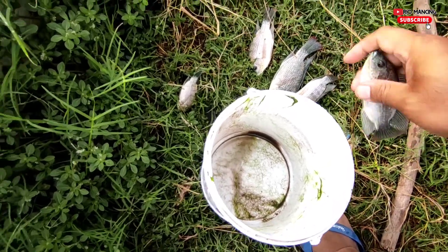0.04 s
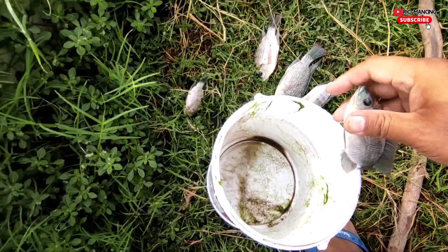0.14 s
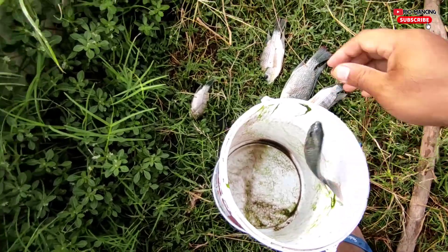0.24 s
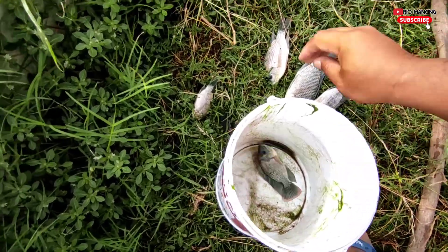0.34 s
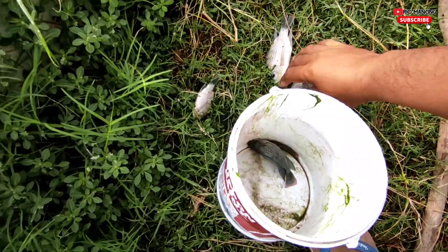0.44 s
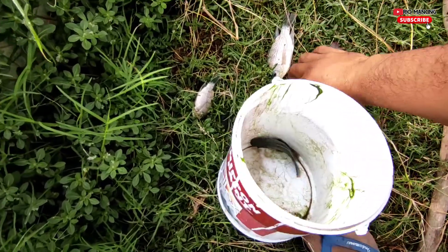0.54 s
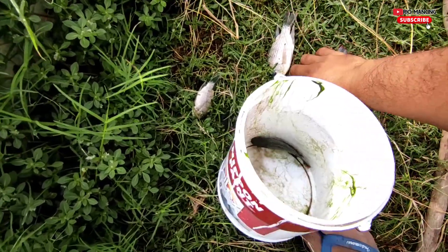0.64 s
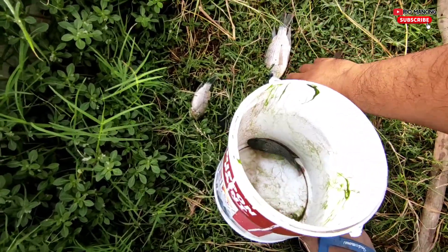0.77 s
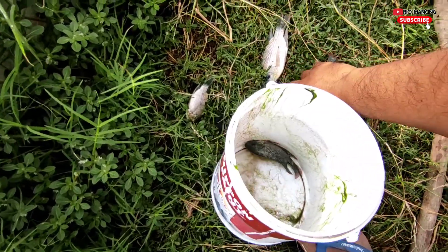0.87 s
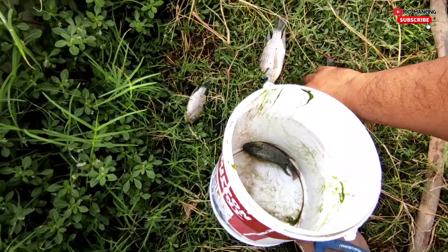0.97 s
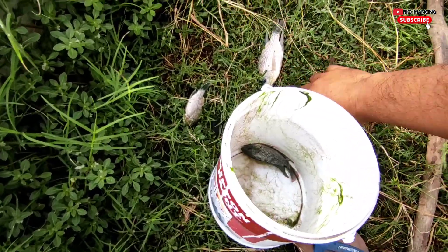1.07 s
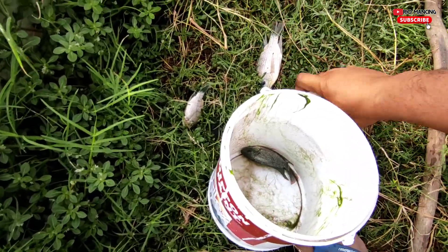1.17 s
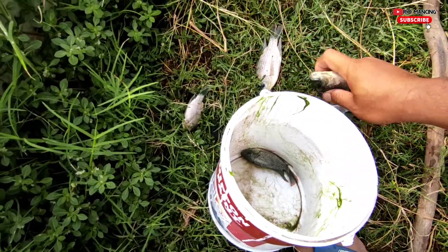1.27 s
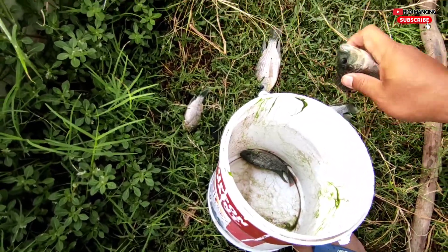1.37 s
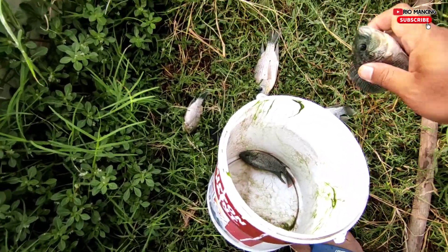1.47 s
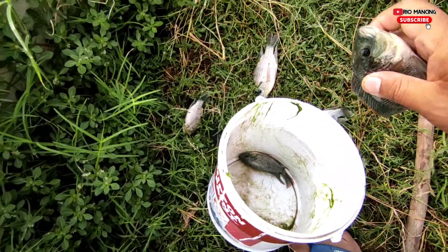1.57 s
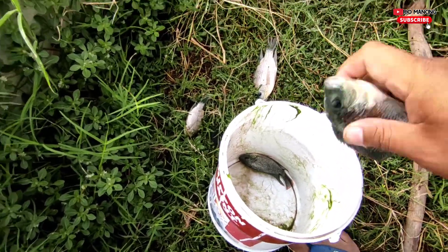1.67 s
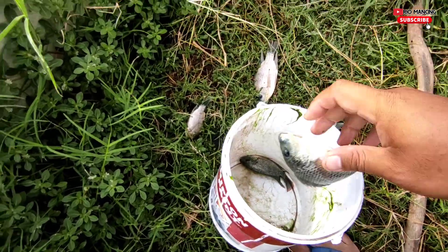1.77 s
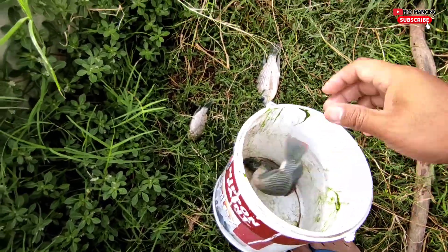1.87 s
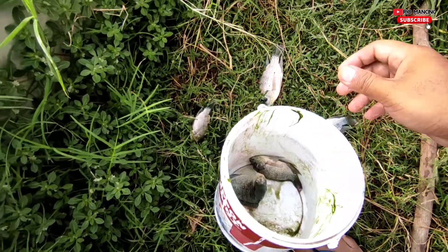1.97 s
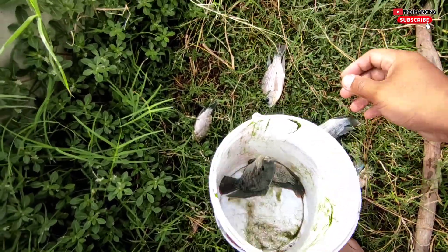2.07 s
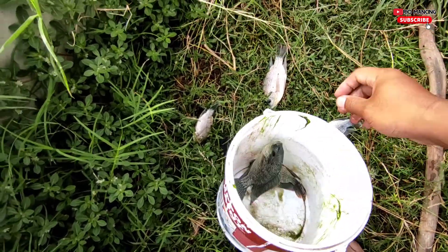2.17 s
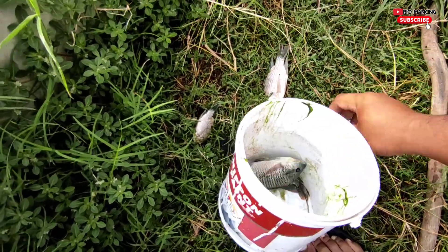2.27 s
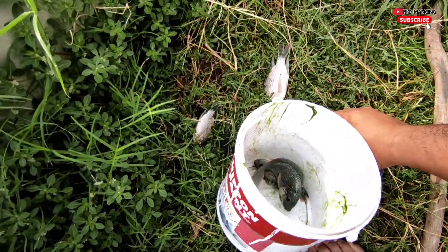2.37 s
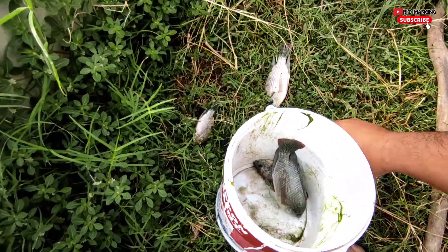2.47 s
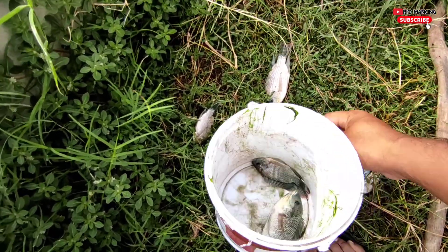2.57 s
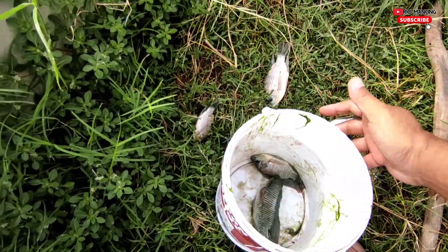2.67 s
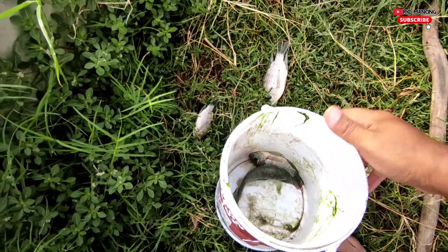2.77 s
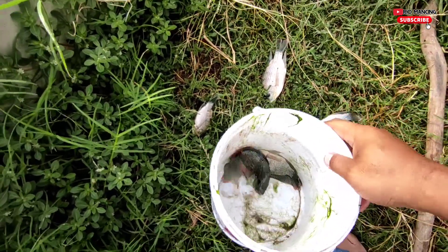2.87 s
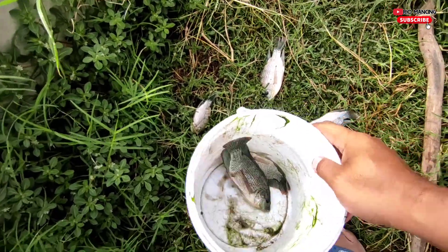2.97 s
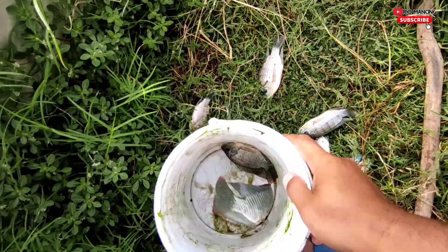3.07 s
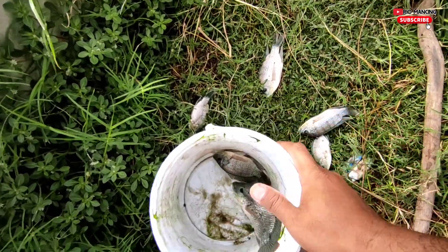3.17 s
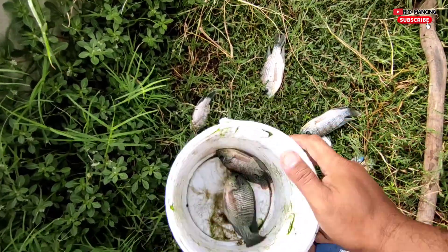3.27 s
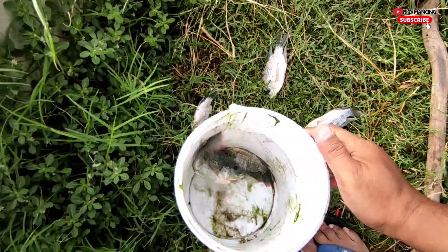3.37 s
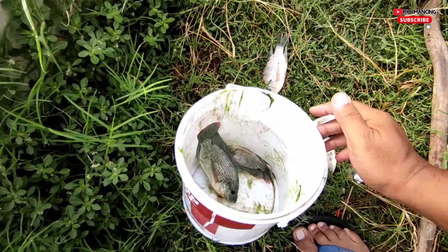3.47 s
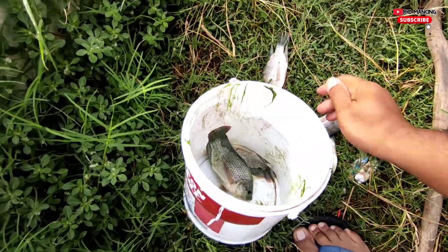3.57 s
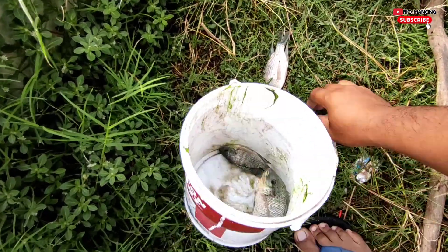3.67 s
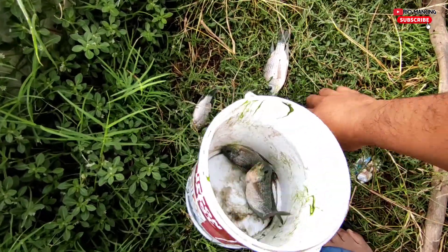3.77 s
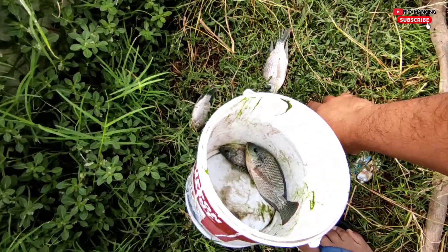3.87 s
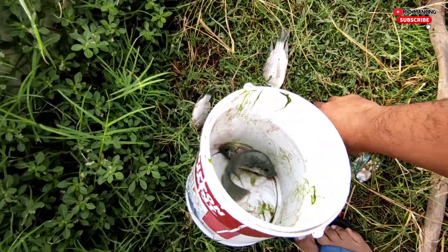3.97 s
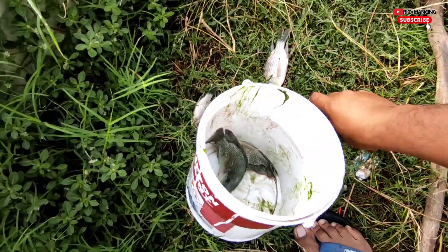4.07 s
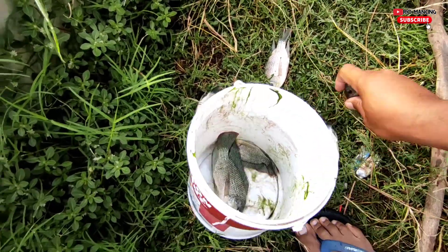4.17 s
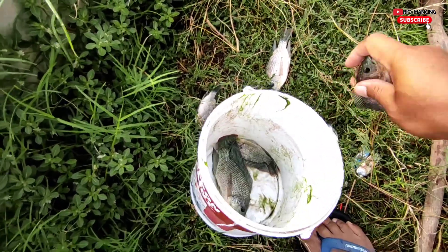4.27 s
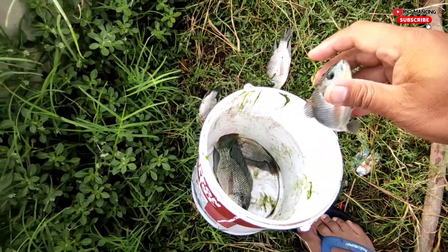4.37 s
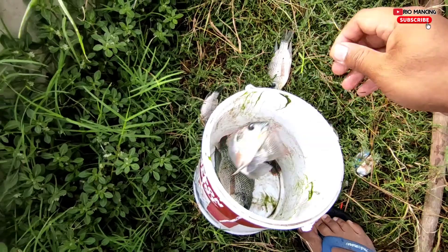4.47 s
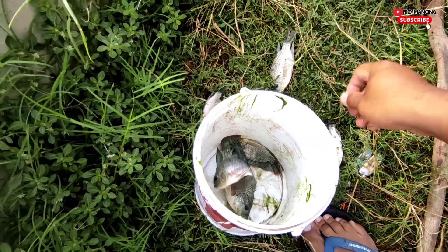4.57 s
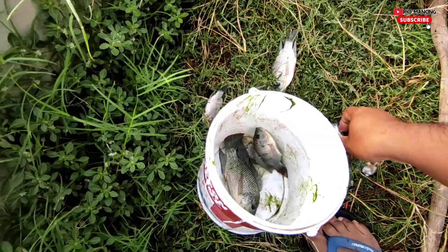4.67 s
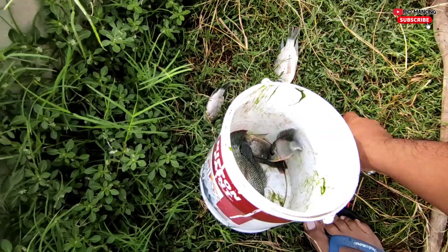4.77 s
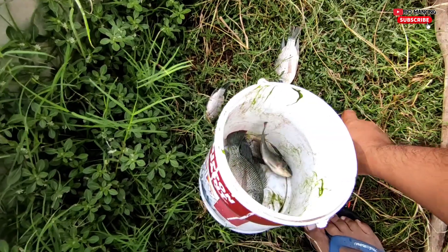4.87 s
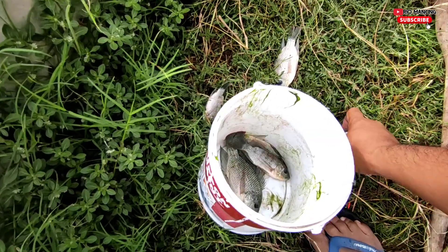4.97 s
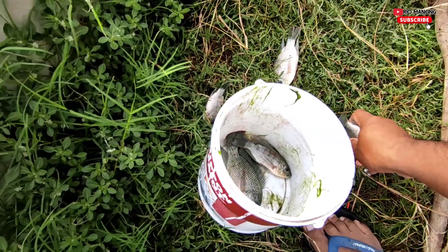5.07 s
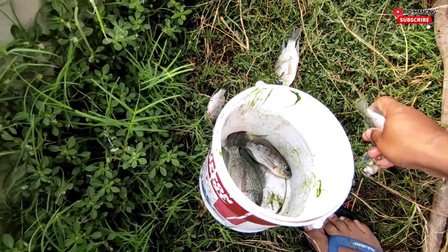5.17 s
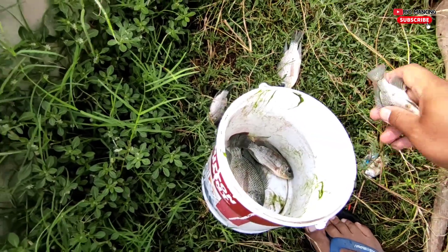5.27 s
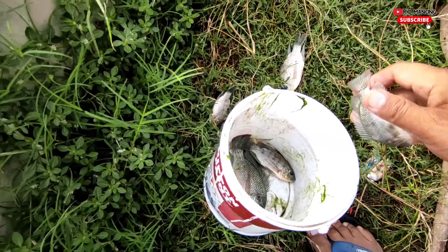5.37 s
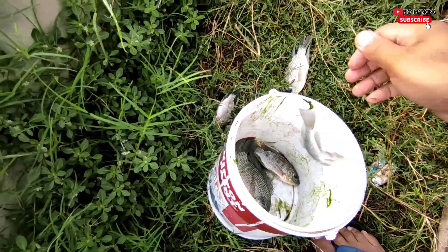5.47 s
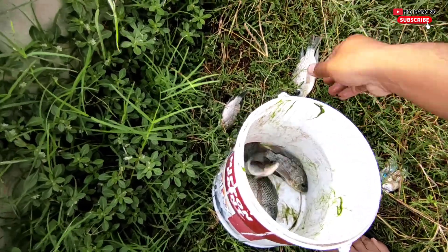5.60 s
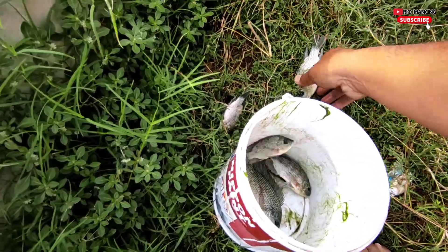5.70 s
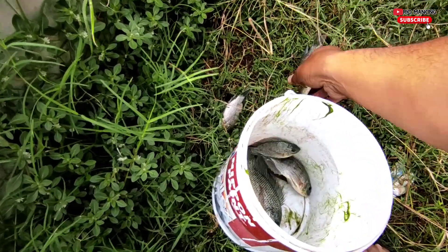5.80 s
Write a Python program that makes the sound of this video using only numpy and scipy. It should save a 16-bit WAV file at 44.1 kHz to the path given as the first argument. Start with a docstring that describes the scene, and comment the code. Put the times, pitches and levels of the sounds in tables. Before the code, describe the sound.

Live fish drop one by one into a plastic bucket outdoors, thumping hollowly and slapping wetly while an insect buzzes thinly nearby.

```python
"""An insect buzzes in the weeds over low breeze rumble and a faint wash of open air; a cricket chirps far off.
Live fish then drop into a plastic bucket on grass and flap about: struck modes give the thumps of their bodies.
Enveloped, coloured noise gives the wet tail smacks, a faint tick in the grass, the slither of scales
and the insect's wing strokes. Damped sines nudge the bucket over the turf, and swells of low noise groan
as a hand shifts it."""
import sys
import numpy as np
from scipy import signal
from scipy.io import wavfile
from scipy.ndimage import uniform_filter1d

SR = 44100
rng = np.random.default_rng(int(sys.argv[2]) if len(sys.argv) > 2 else 0)


def output_pcm(signal):
    """Save a mono or channel-first signal as 16-bit PCM at the path in sys.argv[1].

    Samples are clipped to [-1, 1] before scaling.
    """
    pcm = np.clip(np.atleast_2d(signal).T, -1, 1) * 32767
    wavfile.write(sys.argv[1], SR, np.round(pcm).astype(np.int16))


N = 257544
TIME = np.arange(N) / SR  # s
PORT_SHIFT = 0.0175  # the left microphone port rings this share higher, the right one lower


def amp(db):
    """Decibels to gain."""
    return 10 ** (np.asarray(db) / 20)


def unit(x):
    """Scales to rms 1."""
    return x / np.sqrt(np.mean(x ** 2) + 1e-20)


def sides(db):
    """Left and right gains for a level difference, positive to the left."""
    gains = amp(np.array([[db / 2], [-db / 2]]))
    return gains / gains.mean()


def level(curve):
    """Gain along a curve of (time [s], level [dB]), with short fades at its ends and silence outside."""
    s, db = np.transpose(curve)
    fade = np.interp(TIME, [s[0] - 0.02, s[0], s[-1], s[-1] + 0.044], [0, 1, 1, 0])
    return amp(np.interp(TIME, s, db)) * fade


def swell(s, half):
    """A smooth rise and fall around time s, down to 1/e at half seconds either side."""
    return np.exp(-np.minimum(((TIME - s) / half) ** 2, 20))


def add(mix, s, sound):
    """Mixes a stereo sound in at time s."""
    part = mix[:, max(round(s * SR), 0):][:, :sound.shape[1]]
    part += sound[:, :part.shape[1]]


def pair(size, alike):
    """White noise at two microphones, partly shared."""
    z = rng.standard_normal((3, size))
    alike = np.clip(alike, 0, 1)
    return np.sqrt(alike) * z[0] + np.sqrt(1 - alike) * z[1:]


def wander(size, per_s):
    """Random drift of rms a little under 1: straight lines between per_s random points a second."""
    knots = np.arange(size) * per_s / SR
    return np.interp(knots, np.arange(size), rng.standard_normal(size))


def tint(x, spectrum):
    """Colours each channel with a minimum-phase filter, at unit power gain on the left."""
    f, db = np.transpose(spectrum)
    hz = abs(np.fft.fftfreq(4096, 1 / SR)) + 1
    curves = [np.interp(np.log(hz), np.log(f * (1 + k * PORT_SHIFT)), db) for k in (1, -1)]
    log_gain = np.log(amp(curves))
    response = np.exp(np.conj(signal.hilbert(log_gain)))
    taps = np.fft.ifft(response).real[:, :len(hz) // 2]
    return signal.oaconvolve(x, taps / np.linalg.norm(taps[0]), axes=1)[:, :x.shape[1]]


def patchy(x, db, size):
    """The colour shifts from moment to moment, as the fish screen different parts of the wall."""
    z = signal.stft(x, nperseg=512, noverlap=384)[2]
    patches = rng.standard_normal(z.shape[1:])
    for axis in (0, 1):  # smooth over frequency, then over time
        patches = uniform_filter1d(patches, size[axis], axis)
    gain = unit(amp(db * np.minimum(unit(patches), 1)))  # deep notches, low crests
    return signal.istft(z * gain, nperseg=512, noverlap=384)[1][:, :N]


def inside(x, wet_db, t60, dull_hz=5000, count=160):
    """Adds the quick reflections between the bucket's walls, which lose their treble."""
    t = np.arange(SR // 6) / SR
    # scattered echoes, crowded towards the start
    at = SR // 800 + (len(t) * 0.9 * rng.random((2, count)) ** 1.5).astype(int)
    taps = np.zeros((2, len(t)))
    np.put_along_axis(taps, at, rng.choice([-1., 1.], at.shape), 1)
    taps = (taps + taps[::-1] / 2) * amp(-60 * t / t60)  # each side also hears half of the other
    taps = taps / np.linalg.norm(taps[0])
    taps = signal.lfilter(*signal.butter(1, dull_hz, fs=SR), taps)
    return x + amp(wet_db) * signal.oaconvolve(x, taps, axes=1)[:, :N]


# colour of the open air: (frequency [Hz], relative density [dB per Hz])
FIELD_COLOUR = [(30, 12.5), (250, 10), (550, 8.5), (1000, 1), (1800, -3.5), (4500, -3.5), (5600, -4.5),
                (6500, -3.5), (9800, -7.5), (11000, -28), (16000, -39)]


def field(gain_db=-70):
    """The faint wash of open air is steady broadband noise."""
    return amp(gain_db) * tint(pair(N, 0.096), FIELD_COLOUR)


# the chirping: (time of one chirp's crest [s], pitch [Hz], rate [chirps per s])
CRICKET_CHIRP = (.29, 5550, 3.92)
# the cricket carries only now and then: (time [s], level before the fading [dB])
CRICKET_LEVEL = [(0, -83), (0.9, -72), (1.7, -76.5), (2.4, -82), (5.84, -83)]


def cricket(pan_db=-4, sharp=3.0, fade_db=2):
    """Faint chirps of narrow noise, blurred by the grass and fading in and out on the breeze."""
    crest, hz, per_s = CRICKET_CHIRP
    chirps = np.exp(sharp * (np.cos(2 * np.pi * per_s * (TIME - crest)) - 1))
    fading = amp(fade_db * np.tanh(wander(N, 4.4)))
    band = [(hz * 0.8, -40), (hz, 0), (hz * 1.2, -40)]  # (Hz, dB)
    return level(CRICKET_LEVEL) * sides(pan_db) * chirps * fading * tint(pair(N, 0.4), band)


INSECT_HZ, INSECT_LEAD_S = 173, 0.00041  # mean wing strokes a second; lead at the left microphone
# the insect's course: (time [s], level before the gain [dB])
INSECT_LEVEL = [(0.0, -51), (0.89, -50.5), (1.3, -54), (3.84, -52), (4.41, -54), (4.8, -50.5),
                (5.02, -51.5), (5.84, -51.5)]
# colour of the wing rasp: (frequency [Hz], relative density [dB per Hz])
BUZZ_COLOUR = [(5000, -48.5), (6800, -29), (7350, -22.5), (7750, -1), (8250, 7), (8700, 3.5), (9200, -5),
               (10100, -17.5), (10500, -57.5), (11500, -88.5)]


def insect(gain_db=3, depth=0.3, drift=0.0035, flutter_db=1.7, pan_db=-3.0, alike=0.095):
    """Each wing stroke rasps a short, high burst of noise, which reaches the left microphone first."""
    strokes = np.cumsum(INSECT_HZ * (1 + drift * wander(N, 3.8))) / SR
    beat = 1 + depth * np.cos(2 * np.pi * strokes)
    rasp = unit(beat * amp(flutter_db * wander(N, 26)))
    left, right = tint(rasp * pair(N, alike), BUZZ_COLOUR)
    right = np.roll(right, round(INSECT_LEAD_S * SR))
    return amp(gain_db) * level(INSECT_LEVEL) * sides(pan_db) * np.array([left, right])


# the breeze and low noise: (time [s], level before the pan [dB])
BREEZE_LEVEL = [(0, -51.5), (2.3, -50), (3.0, -46), (3.4, -46.5), (3.8, -43), (4.2, -51), (4.5, -44),
                (4.9, -46.5), (5.84, -47.5)]
# colour of the low noise: (frequency [Hz], relative density [dB per Hz])
LOW_COLOUR = [(20, -8), (60, 5), (110, -1), (180, -4), (300, -14), (500, -23.5), (900, -36.5),
              (2000, -78.5)]
# colour of the breeze on the microphones: (frequency [Hz], relative density [dB per Hz])
GUST_COLOUR = [(20, 4.5), (50, -2.5), (100, -11), (250, -22.5), (1000, -64.5)]


def breeze(lumps, gusts_db=-5):
    """Low noise partly shared by the microphones, and a breeze that brushes each one separately."""
    low = tint(lumps * pair(N, 0.57), LOW_COLOUR)
    gusts = amp(gusts_db) * tint(lumps * pair(N, 0), GUST_COLOUR)
    return level(BREEZE_LEVEL) * (low + gusts)


# the hand shifts the bucket: (time [s], level before the pan [dB], half length [s])
HAND_SHIFTS = [(3.03, -40.5, 0.18), (3.835, -36.5, 0.094), (4.55, -49.5, 0.31)]
# colour of the bucket under the hand: (frequency [Hz], relative density [dB per Hz])
GRIP_COLOUR = [(20, -9), (70, -4), (130, -0.5), (220, -0.5), (300, -8.5), (380, -2.5), (500, -22),
               (1500, -52)]


def handling(lumps):
    """The bucket groans dully under the hand, in slow swells of low noise."""
    grip = sum(amp(db) * swell(s, half) for s, db, half in HAND_SHIFTS)
    return grip * tint(lumps * pair(N, 0.64), GRIP_COLOUR)


def rumble(lump_db=3, pan_db=5):
    """Breeze and handling share one lumpy flow, stronger at the left microphone."""
    lumps = unit(amp(lump_db * wander(N, 25)))
    return sides(pan_db) * (breeze(lumps) + handling(lumps))


ROCK_DB, ROCK_LAG_S, ROCK_HZ = -24, 0.0162, 138.4  # rock after each thump: relative level, delay, pitch
DRAG_FROM_S, DRAG_TO_S, DRAG_DB = 3.829, 3.93, -29.5  # the bucket judders as it is shoved over the turf
JUDDER_HZ, JUDDER_SPREAD = 141, 0.44  # middle pitch of the judders, and their spread in octaves
# the bucket is nudged on the turf: (time [s], peak level before the pan [dB], pitch [Hz])
NUDGES = [(0.408, -35, 122), (2.363, -26, 139), (3.735, -35, 151), (3.853, -23, 100), (4.407, -26.5, 174.4),
          (4.503, -32, 87), (5.313, -35.5, 72.2), (5.734, -37, 72.6)]


def bumps(width_s=0.00091, t60=0.06, pan_db=7, uneven_s=0.0026, count=5):
    """The turf damps the bucket, so each nudge, rock or judder is a dull, quickly dying sine."""
    mix, t = np.zeros((2, N)), np.arange(SR // 8) / SR
    rocks = [(s + ROCK_LAG_S, db + ROCK_DB, ROCK_HZ) for s, db, *_ in THUMPS]
    judders = []
    for s in np.linspace(DRAG_FROM_S, DRAG_TO_S, count):
        late, high = rng.standard_normal(2)
        judders.append((s + uneven_s * late, DRAG_DB, JUDDER_HZ * 2 ** (JUDDER_SPREAD * high)))
    for s, db, hz in NUDGES + rocks + judders:
        envelope = (1 - np.exp(-t / width_s)) * amp(-60 * t / t60)
        bump = envelope * np.sin(2 * np.pi * hz * t)
        add(mix, s, amp(db) * sides(pan_db) * bump / abs(bump).max())
    return mix


WIPE_HALF_S = 0.017
SKID_DB, SKID_LAG_S = -25.5, 0.0093  # the body skids a little after each thump: relative level, delay
# scales sliding on wet plastic, one curve per bout of wriggling: (time [s], level before the gain [dB])
SLITHER_BOUTS = [
    [(0.43, -70), (0.55, -54.5), (0.66, -72), (1.1, -77)],
    [(2.19, -56), (2.27, -48.5), (2.4, -55), (2.82, -57.5), (2.9, -48), (3.15, -45.5), (3.45, -53.5),
     (3.55, -55.5)],
    [(3.58, -55), (3.68, -59), (3.82, -46), (3.95, -50), (4.05, -59.5), (4.23, -53.5), (4.29, -61.5)],
    [(4.47, -73), (4.54, -63.5), (4.63, -54), (4.72, -41.5), (4.8, -52.5), (5.08, -65)],
    [(5.6, -62.5), (5.76, -53), (5.84, -70)],
]
# a fish wipes along the wall or through the hand:
# (time [s], level before the wipe gain [dB], wet fizz relative to the wipe [dB])
WIPES = [(0.396, -29, -4), (1.888, -46, 4), (1.962, -25.5, -2.5), (2.054, -33, -12), (2.192, -38, -19),
         (2.225, -33.5, 1), (2.366, -45, -25), (2.464, -33.5, 1.5), (2.622, -34.5, 0), (3.502, -41, -22),
         (3.724, -30, 1), (3.908, -34.5, -13), (3.966, -38, 1.5), (4.573, -26, 2), (4.605, -31, 2),
         (4.679, -24.5, 0.5), (4.728, -36.5, 5.5), (4.848, -46, 5), (4.960, -54.5, 7), (5.639, -36, 2),
         (5.665, -44, 3)]
# colour of the scales: (frequency [Hz], relative density [dB per Hz])
SCALE_COLOUR = [(150, -15.5), (380, 10.5), (650, -7), (1050, 2.5), (1500, -2), (2200, -0.5), (3400, -6.5),
                (5000, -12.5), (7000, -4), (12000, -34)]


def slither(gain_db=-3, wipe_db=-11, fizz_db=-3, skid_fizz_db=-12, clump_db=5.0, grain_db=4.0, patchy_db=4):
    """Scales and fins catch and slip in clumps of small clicks; each wipe swells them and squeezes out water."""
    rub = amp(gain_db) * sum(level(bout) for bout in SLITHER_BOUTS)
    fizz = amp(fizz_db) * rub
    skids = [(s + SKID_LAG_S, db + SKID_DB, skid_fizz_db) for s, db, *_ in THUMPS]
    for s, db, wet_db in WIPES + skids:
        stroke = amp(db + wipe_db) * swell(s, WIPE_HALF_S)
        rub = rub + stroke
        fizz = fizz + amp(wet_db) * stroke
    clumps_db = clump_db * np.tanh(wander(N, 120))
    catches = unit(amp(clumps_db + grain_db * wander(N, 2500)))
    dry_rub = tint(rub * catches * pair(N, 0.23), SCALE_COLOUR)
    wet_fizz = tint(fizz * catches * pair(N, 0.075), SPRAY_COLOUR)
    return patchy(inside(dry_rub + wet_fizz, wet_db=-4.5, t60=0.069), patchy_db, size=(4, 16))


SMACK_RISE_S = 0.0007
# a wet tail or flank smacks the plastic; the faint one at 1.402 s is a tick in the grass:
# (time [s], level before the layer gains [dB], mid-range body relative to the spray [dB],
# left-right difference [dB], t60 [s])
SMACKS_AND_TICK = [(0.379, -21, -2.5, -0.5, 0.02), (0.414, -33.5, 0, 0, 0.066),
                   (1.402, -48, -22, -5, 0.037), (1.941, -32.5, -1, -6, 0.061),
                   (1.996, -30, -1.5, 0.5, 0.11), (2.075, -33.5, -8, -3, 0.043), (2.260, -33, 9, 0, 0.078),
                   (2.280, -31, -1, 1, 0.073), (2.457, -31.5, -1.5, -6, .05),
                   (2.4848, -35, 10.5, -2, 0.027), (2.683, -30.5, 4.5, -3, 0.086),
                   (2.715, -27.5, -12, -1, .027), (2.745, -29.5, -4.5, 1, .022),
                   (2.875, -36.5, 7, 3, 0.032), (3.064, -11.5, -13.5, 2, 0.032),
                   (3.163, -30, 0.5, -10, 0.047), (3.181, -14, -26, -4.5, 0.037),
                   (3.324, -16, -36, 2, 0.013), (3.3315, -21, -25, -3, 0.011),
                   (3.399, -31.5, -2.5, 0, 0.12), (3.615, -28, -1.5, -2, 0.053),
                   (3.643, -27.5, -10.5, -1, 0.043), (3.704, -37.5, 4.5, -3, 0.16),
                   (4.055, -16.5, -4.5, 4.5, 0.029), (4.146, -25, 1, -1, 0.03), (4.580, -20, 4, 2, 0.016),
                   (4.639, -24, -11, -5, 0.029), (4.694, -25, -18, -14, 0.023),
                   (4.7143, -29, 8.5, -4, 0.047), (4.873, -22.5, -10.5, -0.5, 0.023),
                   (5.678, -23.5, -10.5, 5, 0.028)]
# colour of bursting water, in the slither too: (frequency [Hz], relative density [dB per Hz])
SPRAY_COLOUR = [(300, -29), (1500, -26), (4500, -13.5), (6500, -5.5), (7700, 2.5), (8800, 1.5),
                (9700, -9.5), (11000, -21.5), (12800, -22), (15500, -28)]
# colour of the slapping flank: (frequency [Hz], relative density [dB per Hz])
FLESH_COLOUR = [(150, -32.5), (380, 12), (650, -5), (1100, 2), (1500, 0), (2200, 3.5), (3200, -4.5),
                (5000, -8), (7000, -36), (12000, -64)]


def smacks(spray_db=-3, flesh_db=-5.5, grain_db=4.5, brush_db=-24, brush_s=0.0057, patchy_db=4):
    """A tail brushes in, then its water film bursts in tiny cracks; the tick in the grass is made the same way."""
    spray, flesh = np.zeros((2, N)), np.zeros((2, N))
    t = np.arange(-SR // 40, SR // 6) / SR  # starts before the hit, for the brush
    for s, db, body_db, pan_db, t60 in SMACKS_AND_TICK:
        decay = amp(-60 * np.maximum(t - 2 * SMACK_RISE_S, 0) / t60)
        burst = (1 + np.tanh(t / SMACK_RISE_S)) * decay
        shape = burst / burst.max() + amp(brush_db) * np.exp(-abs(t) / brush_s)
        cracks = amp(db) * shape * unit(amp(grain_db * wander(len(t), 1510.5)))
        add(spray, s + t[0], cracks * sides(pan_db) * pair(len(t), 0.0073))
        add(flesh, s + t[0], cracks * amp(body_db) * pair(len(t), 0.53))
    splash = inside(amp(spray_db) * tint(spray, SPRAY_COLOUR), wet_db=-12.5, t60=0.25)
    slap = inside(amp(flesh_db) * tint(flesh, FLESH_COLOUR), wet_db=-6, t60=0.27)
    return patchy(splash + slap, patchy_db, size=(4, 10))


AIR_HZ, BUILD_S = 380, 0.003284  # reference pitch and build-up time of the air tone
BASE_FOLLOWS = 0.45  # dB of base boom for each dB of ring in the plastic
RING_LENGTH, LINGER_PER_DB = 0.61, 0.017  # share of the free ring time; a muted ring is fainter but lingers
THUMP_PAN_DB = 7.5  # left-right
# a fish body hits the bucket; skids and rocks follow it too: (time [s], drive level before the gain [dB],
# air tone [Hz], ring of the plastic before its trim [dB], muting by the body [dB])
THUMPS = [(0.378, -18.5, 396, -24, -24), (0.385, -12.5, 389, -16, -13.5), (0.393, -23, 320, -5, -4),
          (0.402, -22.5, 391, -17, -4), (0.447, -36, 410, -6.5, -8), (1.942, -29, 340, -15, -2),
          (1.962, -17.5, 361, -18.5, -6), (1.980, -17.5, 370, -17, -3.5), (2.026, -28, 426, -9.5, -6),
          (2.265, -17.5, 390, -36, 1), (2.343, -23.5, 451, -17, -7.5), (2.361, -36.5, 362, -20.5, 3),
          (2.485, -12, 385, -8, -0.5), (2.630, -32.5, 448, -11.5, -14), (2.685, -7, 380.3, -19, -1.5),
          (2.991, -25, 383, -27, -3), (3.256, -9, 384.6, -10, -4), (3.327, -26, 410, -6, -15),
          (3.489, -6, 368, -24, -19), (3.771, -28, 406, -5.5, -20), (3.908, -33, 423, -4, -36),
          (4.148, -9.5, 377.6, -13, -14), (4.238, -37, 409, -9.5, -8), (4.580, -32, 377, -10, 1),
          (4.645, -16, 376, -19, -7), (4.674, -27.5, 368, -13, -11), (4.854, -22, 393, -35, -19),
          (4.874, -28, 405, -6.5, 2.5), (5.629, -21.5, 356, -31, -14)]
# free modes of the bucket, from its base through the air column to the wall:
# (frequency before loading [Hz], level before the zone trims [dB], t60 before the ring length [s])
BUCKET_MODES = [(118, 9, 0.18), (172, 16.5, 0.14), (214, 18, 0.11), (317, 0.5, 0.026), (375.2, 2.5, 0.14),
                (415.4, -22.5, 0.25), (602, -13, 0.052), (741, -11.5, 0.079), (938, -1.5, 0.02),
                (1103, 1, 0.041), (1210, -11, 0.016), (1190, -8.5, 0.0058), (1978, -8.5, 0.033),
                (2430, -17, 0.06)]


def thumps(gain_db=1, wall_db=1, base_db=-19, base_rise=0.00835, wall_rise=0.0011, scatter=0.049, contact=0.012):
    """A soft body pushes on the plastic: the wall rings at once, air and base build up over a few cycles."""
    mix, t = np.zeros((2, N)), np.arange(SR // 4) / SR
    hz, mode_db, t60 = np.transpose(BUCKET_MODES)[:, :, None]
    # each mode's share of base, air and wall, crossfaded by pitch
    zones = np.log([210, 310, 460, 750])
    base = np.interp(np.log(hz), zones, [1, 0, 0, 0])
    wall = np.interp(np.log(hz), zones, [0, 0, 0, 1])
    air = 1 - base - wall
    rise = base * base_rise + wall * wall_rise + air * BUILD_S
    settled = 1 - np.exp(-(t / contact) ** 4)  # the body comes to lie on the plastic and mutes it
    for s, db, air_hz, ring_db, muted_db in THUMPS:
        # the fish lying in the bucket load it differently each time
        detune = 1 + scatter * (1 - air) * rng.standard_normal(hz.shape)
        loaded = hz * (air_hz / AIR_HZ) ** air * detune
        zone_db = base * (BASE_FOLLOWS * ring_db + base_db) + wall * (ring_db + wall_db)
        size_db = mode_db + zone_db + (1 - base / 2) * muted_db * settled
        length = RING_LENGTH - LINGER_PER_DB * muted_db
        size = amp(size_db - 60 * t / (t60 * length)) * (1 - np.exp(-(t / rise) ** 2))
        # the modes swing together at the height of the push
        ring = (size * np.sin(2 * np.pi * loaded * (t - 1.522 * rise))).sum(0)
        add(mix, s, amp(db + gain_db) * sides(THUMP_PAN_DB) * ring)
    return mix


def scene():
    """Fish and bucket over the sounds of the field."""
    background = field() + cricket() + insect() + rumble()
    return background + bumps() + slither() + smacks() + thumps()


def record(dry):
    """The recorder's band limit: a steep low-pass at 16 kHz."""
    taps = signal.firwin(511, 16000, window=("kaiser", 9), fs=SR)
    return signal.oaconvolve(dry, taps[None], "same", axes=1)


dry = scene()
out = record(dry)
output_pcm(out)
```